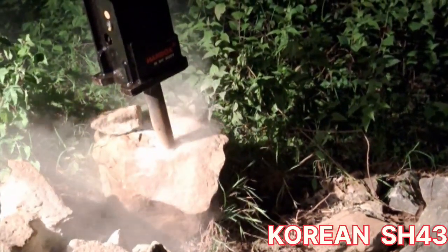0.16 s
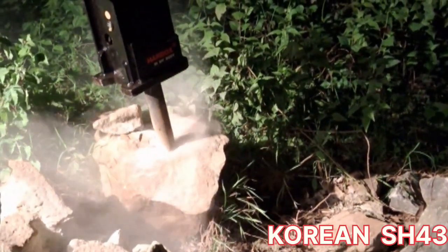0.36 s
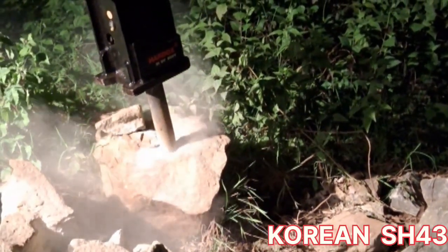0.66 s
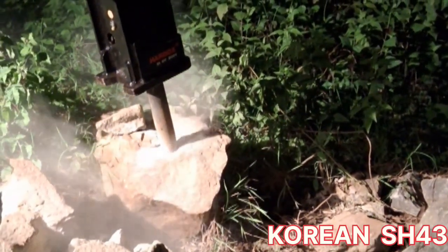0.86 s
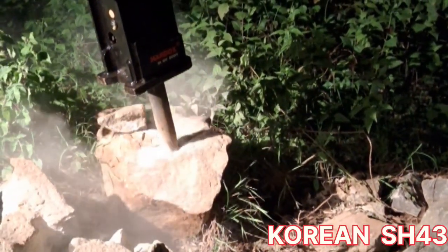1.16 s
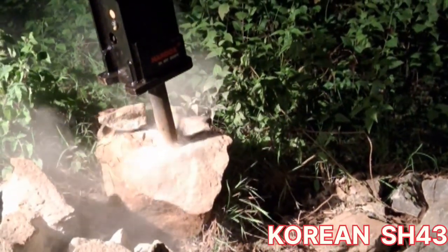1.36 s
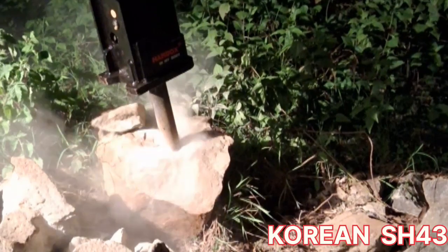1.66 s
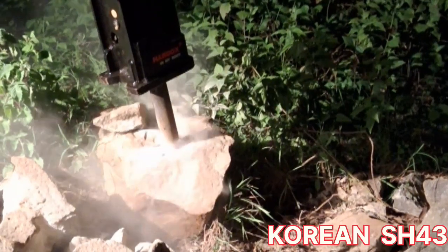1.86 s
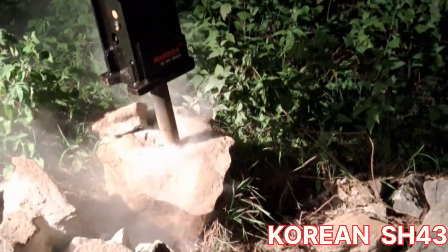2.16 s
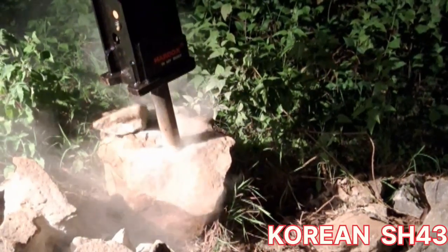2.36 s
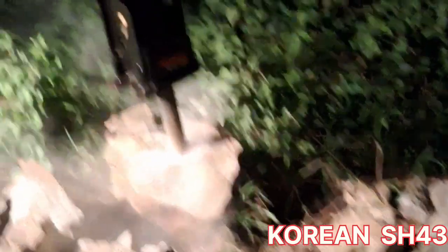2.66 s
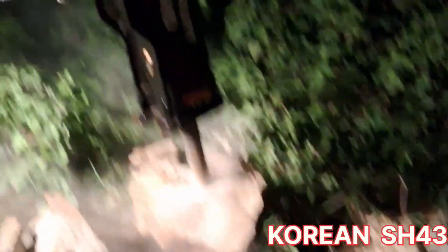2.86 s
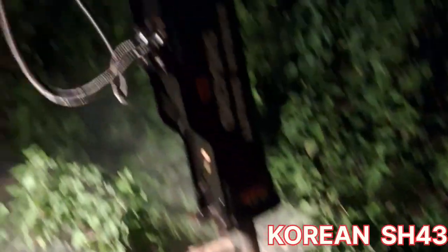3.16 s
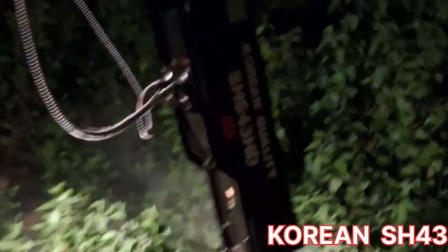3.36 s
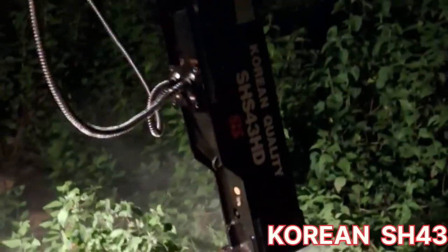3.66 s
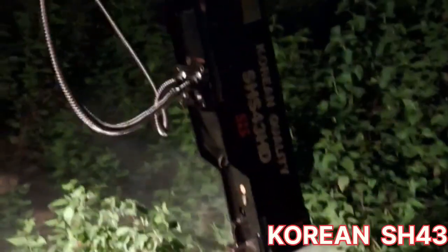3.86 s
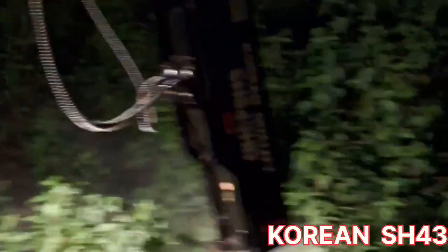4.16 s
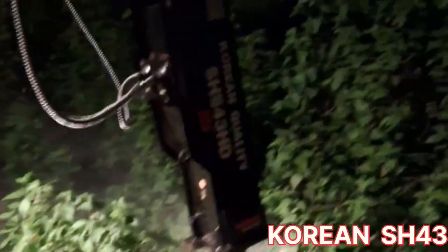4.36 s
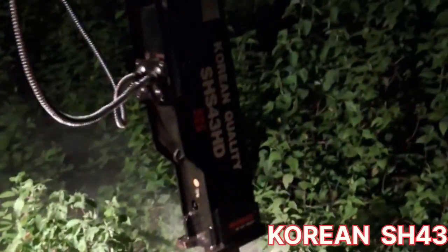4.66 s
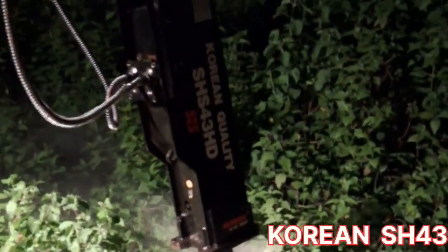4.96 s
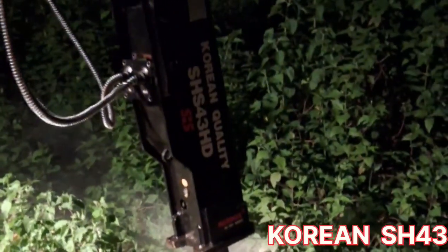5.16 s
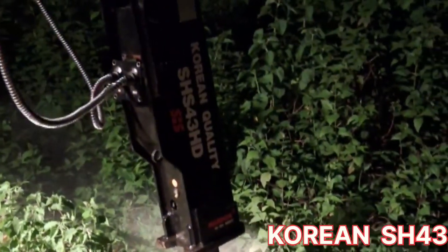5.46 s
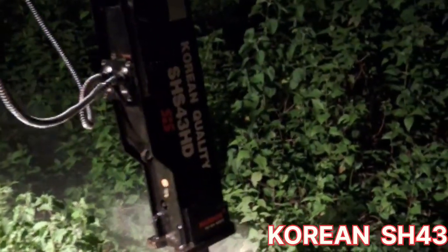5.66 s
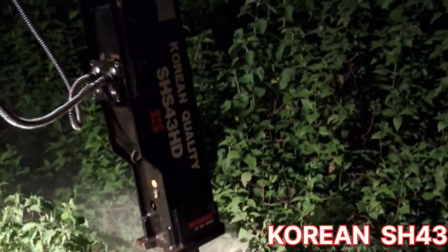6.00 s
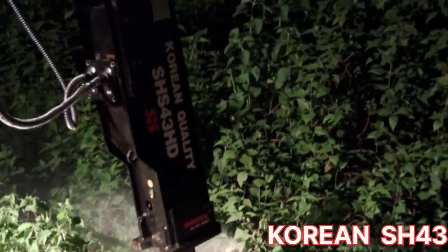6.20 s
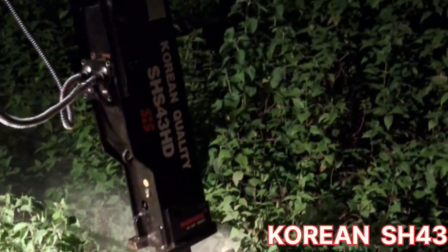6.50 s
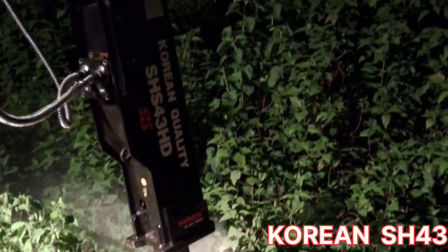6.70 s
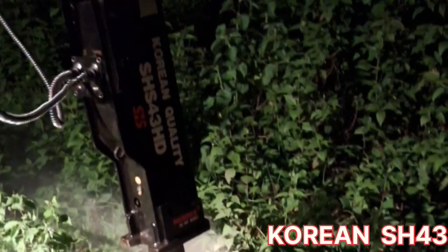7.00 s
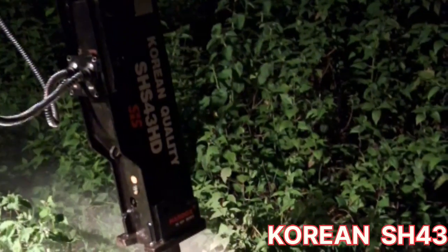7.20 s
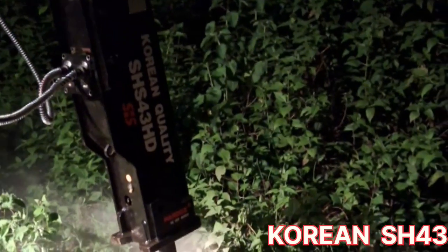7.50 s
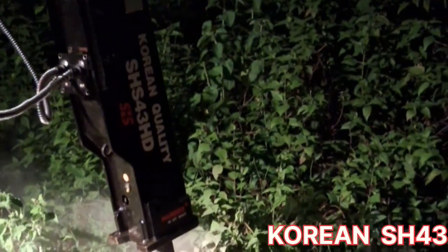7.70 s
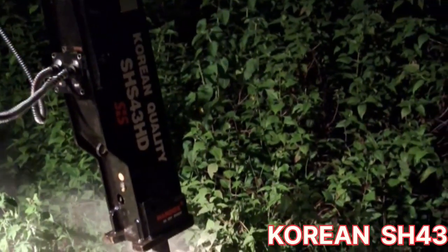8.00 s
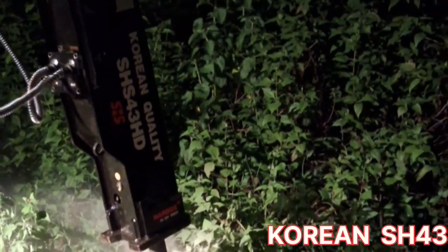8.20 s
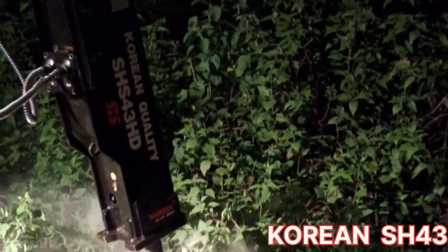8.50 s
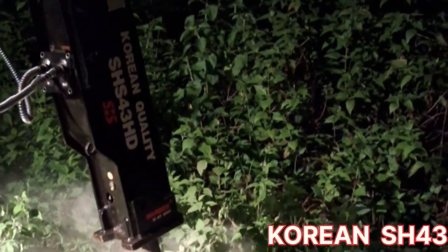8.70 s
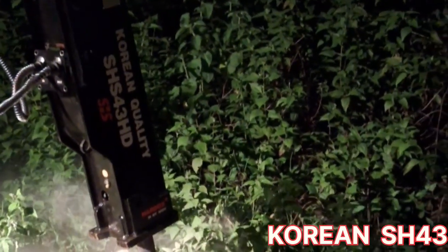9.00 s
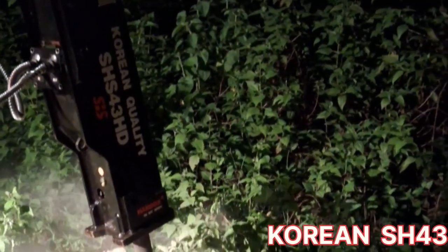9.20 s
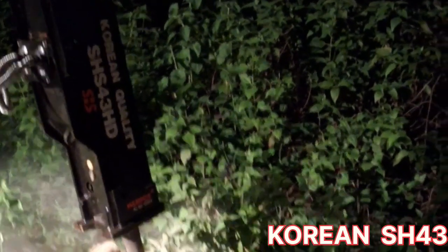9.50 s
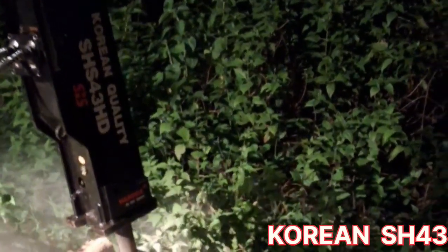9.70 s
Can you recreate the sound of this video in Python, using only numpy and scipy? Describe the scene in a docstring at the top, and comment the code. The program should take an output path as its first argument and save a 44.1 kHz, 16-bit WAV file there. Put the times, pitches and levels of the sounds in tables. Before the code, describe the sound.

Rapid, evenly spaced steel blows on rock, each a hard thump with a short falling ring, gritty crack, boxy casing boom and bright frame clatter. Three bursts, short, long, short, are split by two pauses filled with low diesel throb and hose hiss. A stone falls in the first pause and another after the last burst. Dull echoes return from an overgrown slope; close stereo pickup.

```python
"""Outdoors below an overgrown slope, in stereo: a digger's hydraulic breaker hammers a boulder in three bursts.
At about eleven blows a second, each blow thumps, rings the chisel bar and cracks the rock; filtered noise,
decaying modes and steel partials make the casing boom and the frame clatter. Oil hisses just before each blow.
A loose stone drops in each of two pauses, the slope returns dull echoes, and hoses hiss as filtered noise.
Underneath runs the diesel: exhaust tones at multiples of its firing rate, with throbbing machine noise."""
import sys
import numpy as np
from scipy import signal
from scipy.fft import rfft, irfft, next_fast_len
from scipy.io import wavfile

SR = 44100
rng = np.random.default_rng(int(sys.argv[2]) if len(sys.argv) > 2 else 0)


def dump(signal):
    """Clip the signal to [-1, 1] and save it as 16-bit WAV at the path in sys.argv[1]."""
    limited = np.clip(np.atleast_2d(signal).T, -1, 1)
    pcm = np.round(limited * 32767).astype(np.int16)
    wavfile.write(sys.argv[1], SR, pcm)


N = 434364

TIME = np.arange(N) / SR
BLOW_SAMPLES = int(.36 * SR)
AGE = np.arange(BLOW_SAMPLES) / SR   # seconds since a blow

# Bursts of hammering. Each row: first blow in seconds, number of blows.
BURSTS = [(-.0235, 7), (1.1943, 63), (7.5175, 13)]
# Pace of the piston. Each row: time in seconds, blows per second.
PACE = [(.5, 10.944), (1.2, 11.129), (1.55, 11.147), (2.1, 10.869), (2.9, 10.979), (3.4, 10.937),
        (5, 10.867), (5.6, 10.92), (6.85, 10.855), (7.5, 11.224), (7.75, 11.08), (8.4, 10.443)]
# How far the chisel has sunk into the crumbling rock. Each row: time in seconds, depth from 0 to 1.
CHISEL_DEPTH = [(0, 0), (2.7, 0), (3.3, 0.2), (5, 0.56), (6.5, 0.67), (7.5, 1), (8.7, 0.48)]
# Force of the blows. Each row: time in seconds, level in dB.
FORCE = [(0, -24.5), (1.4, -26), (2, -23.5), (2.8, -25.5), (3.25, -23), (3.7, -25.5), (4.2, -22.5),
         (5.7, -22), (7.6, -22.5), (8, -21), (8.6, -22)]
# The chisel's ring, which drops when the rock grips the tip. Each row: time in seconds, relative level in dB.
CHISEL_RING = [(0, -9.5), (.4, -6.5), (1.2, -12), (2.5, -8), (3.15, -10.5), (3.6, -19), (4.4, -9),
               (5.15, -11.5), (5.6, -15.5), (6.3, -19.5), (6.7, -13), (8.6, -14.5)]
# The casing's boom. Each row: time in seconds, level in dB relative to the force.
CASING_BOOM = [(0, -1.5), (1.3, -3), (3.3, -1.2), (3.8, -2), (5.4, -1.5), (6.13, 1.5), (6.4, -1.5),
               (7.75, -1), (8.06, 2.5), (8.35, -1), (8.6, 4)]


def piston(fresh_hz=1982, sunk_rise_hz=45.3, jitter_s=.0004, pitch_spread_hz=45, boom_spread_db=1.2,
           force_spread_db=0.86):
    """The piston cycles at its pace through each burst, with small chance differences between blows."""
    times = []
    for s, count in BURSTS:
        for _ in range(count):
            times.append(s)
            s += 1 / curve(PACE, s)
    late, sharp, boom, hard = rng.standard_normal((len(times), 4)).T
    depth = curve(CHISEL_DEPTH, times)
    force_db = curve(FORCE, times) + force_spread_db * hard
    # nominal pitch, which the chisel scales as it glides
    hz = fresh_hz + sunk_rise_hz * depth + pitch_spread_hz * (1 + depth) * sharp
    ring_db = curve(CHISEL_RING, times)
    boom_db = force_db + curve(CASING_BOOM, times) + boom_spread_db * boom
    # each row: time in seconds, nominal chisel pitch in Hz, ring, boom and force in dB
    return np.transpose([times + jitter_s * late, hz, ring_db, boom_db, force_db])


def thump(blows, hz=880, length_s=0.00055, centre_s=0.00076, thump_db=15.5):
    """The chisel is driven into the rock: one swing of pressure, down and then up."""
    out = np.zeros(N)
    from_centre = AGE - centre_s
    swing = np.sin(2 * np.pi * hz * from_centre) * np.exp(-(from_centre / length_s) ** 2)
    for s, _, _, _, force_db in blows:
        add(out, s, from_db(force_db + thump_db) * swing)
    return out * from_db([[1], [-1]])   # slightly left


def chisel(blows, settled=.955, glide=0.304, settle_s=0.00299, width_hz=430, rebound_db=-13,
           chisel_db=-3.5, least_ragged=0.28, most_ragged=0.97, ring_t60=0.029):
    """The chisel rings briefly, its pitch falling as it beds in, and rings again on the rebound."""
    out = np.zeros((2, N))
    smooth = signal.butter(3, width_hz, fs=SR, output="sos")
    chance = rng.standard_normal((len(blows), 4))
    vibrations = patterns(memory=0.853, fresh=0.11)
    for (s, hz, ring_db, _, _), pattern, (late, hard, free, bend) in zip(blows, vibrations, chance):
        # the pitch starts at (settled + glide) times nominal, give or take, and falls to settled
        bedding = glide * (1 + 0.2 * bend) * settle_s * (1 - np.exp(-AGE / settle_s))
        phase = 2 * np.pi * hz * (AGE * settled + bedding)
        sine, cosine = np.sin(phase), np.cos(phase)
        # the deeper the chisel sits, the more ragged its tone
        ragged = np.interp(curve(CHISEL_DEPTH, s), [0, 1], [least_ragged, most_ragged])
        flutter = rms_one(signal.sosfilt(smooth, pattern))
        rough = (flutter[0] * sine + flutter[1] * cosine) / np.sqrt(2)
        mid = (1 - ragged) * sine + ragged * rough
        side = (1 - ragged) * cosine / 2 + ragged * flutter[1] * sine
        strike = swell(.0016, .0012, ring_t60 * np.exp(free / 4))
        rebound = from_db(rebound_db + 4.5 * hard) * swell(0.012 + 0.0027 * late, 0.00045, 0.013)
        ring = level_one(widen([mid, side], side_db=-3) * (strike + rebound), .015)
        add(out, s, from_db(ring_db + chisel_db) * ring)
    return out * from_db([[.8], [-.8]])


# Lengthwise modes of the chisel bar. Each row: pitch in Hz, level in dB relative to the force, t60 in seconds.
BAR_MODES = [(3346, -11, .26), (6736, -20, .4)]


def bar(blows, spread_db=4.5, fresh_db=-5):
    """The chisel bar sings on between blows, more strongly once it is seated in the rock."""
    out = np.zeros((2, N))
    chance = rng.standard_normal((len(blows), len(BAR_MODES), 3))
    for (s, _, _, _, force_db), draws in zip(blows, chance):
        for (hz, mode_db, t60), (strength, *turn) in zip(BAR_MODES, draws):
            unseated_db = fresh_db * (1 - curve(CHISEL_DEPTH, s))
            level_db = force_db + mode_db + unseated_db + spread_db * strength
            tone = np.sin(2 * np.pi * hz * AGE + np.array(turn)[:, None])   # own phase left and right
            add(out, s, from_db(level_db) * swell(0.0015, .002, t60) * tone)
    return out


def rock(blows, crack_db=-3, sunk_db=7, spread_db=3.0, t60=0.065, grit_db=1.0):
    """Rock crushes under the tip in a short gritty crack, new at every blow and louder as the chisel sinks in."""
    out = np.zeros((2, N))
    for s, _, _, _, force_db in blows:
        noise = rng.standard_normal((2, BLOW_SAMPLES))
        grit = noise * from_db(grit_db * rng.exponential(1, BLOW_SAMPLES))
        depth_db = sunk_db * curve(CHISEL_DEPTH, s)
        level_db = force_db + crack_db + depth_db + spread_db * rng.standard_normal()
        crack = level_one(grit * swell(0, 0.00022, t60), 0.014)
        add(out, s + 0.00123, from_db(level_db) * crack)
    # each pair: Hz, dB per Hz
    return colour(widen(out, side_db=2.0), [(100, -42), (700, -5), (1100, -2.5), (1600, 4.5), (2400, -9),
                                            (2800, -7.5), (4500, -7.0), (8000, -31), (16000, -36.5)])


# Plate modes of the casing. Each row: pitch in Hz, relative level in dB on fresh rock, relative level in dB
# when sunk in, t60 in seconds.
CASING_MODES = [(140, -16.5, -27, 0.61), (164.2, -15, -26, 0.83), (207, -9, -15.5, 0.2),
                (269.2, -9.5, -15, 0.2), (416.2, 2.5, -9.5, .21), (479.6, 8.5, -1.5, 0.12),
                (497, -8, -24, 0.063), (607.9, 8.5, 2, 0.19), (643.6, 2.5, 0.5, 0.15),
                (685.3, 14.5, 9.5, 0.11), (850, -18, -11, 0.23), (971, -11, 4.5, 0.057),
                (979, -7, -2.5, 0.083), (1103, -35, 2, 0.058)]


def casing(blows, rise_s=.011, detune=.012, spread_db=3.0, phase_spread=0.77):
    """The box around the hammer takes up each blow slowly and booms in plate modes that shift with depth."""
    out = np.zeros((2, N))
    hz, fresh_db, sunk_db, t60 = np.transpose(CASING_MODES)
    envelopes = swell(0.0016, rise_s, t60[:, None])
    phases = rng.uniform(0, 2 * np.pi, len(hz)) + rng.normal(0, 0.075, (2, len(hz)))
    chance = rng.standard_normal((len(blows), 3, len(hz)))
    for (s, _, _, boom_db, _), (strength, turn, strain) in zip(blows, chance):
        mode_db = fresh_db + curve(CHISEL_DEPTH, s) * (sunk_db - fresh_db) + spread_db * strength
        weights = from_db(mode_db) * np.exp(1j * (phases + phase_spread * turn))
        # the plates are pressed a little differently at each blow, which shifts their pitches
        angle = (2 * np.pi * np.outer(hz * (1 + detune * strain), AGE)).astype(np.float32)
        in_phase = weights.real @ (envelopes * np.cos(angle))
        quadrature = weights.imag @ (envelopes * np.sin(angle))
        add(out, s, from_db(boom_db) * level_one(in_phase - quadrature, 0.065))
    return out * from_db([[-.5], [.5]])


# Long-ringing partials of the steel. Each row: pitch in Hz, relative level in dB.
STEEL_PARTIALS = [(1875, -1), (2060, -2), (2190, 13), (2548, 4), (3075, -1), (3385, 3.5), (3854, 0.5),
                  (4200, -2.5), (4590, -6), (4865, -1), (5020, -1), (6790, 6.5), (7040, -6.5), (8872, -1),
                  (10917, -13), (11180, -15), (12450, -17), (13447, -19), (15073, -9)]


def partials(blows, count=160, fine_db=-9, t60=0.13):
    """Main steel partials and many fine ones, struck anew at each blow with separate mid and side strengths."""
    main_hz, main_db = np.transpose(STEEL_PARTIALS)
    hz = np.append(main_hz, rng.uniform(3000, 15800, count))[:, None]
    own = from_db(np.append(main_db, np.full(count, fine_db)))
    tones = np.sin(2 * np.pi * hz * AGE + rng.uniform(0, 2 * np.pi, hz.shape))
    waves = tones * swell(0.003, 0.0011, t60)
    strengths = own * rng.standard_normal((len(blows) * 2, len(hz)))
    pairs = (strengths @ waves).reshape(len(blows), 2, -1)
    return [level_one(pair, 0.038) for pair in pairs]


# Colour of the rattling frame. Each row: frequency in Hz, level in dB per Hz.
RATTLE_COLOUR = [(30, -43.5), (150, -13), (320, -10), (450, 0), (680, 2.5), (800, -5.5), (980, 5.5),
                 (1350, -17.5), (1700, 3.5), (2000, 4), (2350, -1), (2700, -6.5), (3400, -6), (6000, -53)]
# Colour of the bright clatter and of the spurting oil. Each row: frequency in Hz, level in dB per Hz.
CLATTER_COLOUR = [(50, -23.5), (1500, 2), (2450, -2), (2750, -15.5), (3200, -4), (5000, -2.5), (6000, -8),
                  (7400, -7), (8200, -13), (9900, -15), (11200, -10.5), (12200, -10), (13300, -10.5),
                  (14300, -10), (16000, -17)]
# Resonances of the steel. Each row: centre in Hz, width in Hz, peak in dB.
STEEL_RESONANCES = [(3050, 230, 10), (3187, 60, -6.5), (3886, 150, 4), (4870, 84, 0.5), (6660, 250, 3.5),
                    (7040, 32, 1), (8840, 270, 9.5), (10910, 260, 10), (13120, 64, 4), (16100, 100, 8)]


def frame(blows, rattle_db=3.5, clatter_db=-2.0, partials_db=-3.0, valve_db=-30.5, valve_lead_s=.019):
    """Dense steel modes rattle, clatter and ring after each blow; the valve lets oil through just before it."""
    rattle, clatter = np.zeros((2, 2, N))
    dull = level_one(swell(0.001, 0.00013, 0.17), 0.033)
    bright = level_one(swell(0.00029, 0.0003, 0.25), 0.046)
    spurt = level_one(swell(0, .002, .15), .018)
    chance = rng.standard_normal((len(blows), 2))
    lows = patterns(memory=0.787, fresh=0.26)
    highs = patterns(memory=0.69, fresh=0.66)
    for (s, _, _, _, force_db), low, high, ring, (early, loud) in zip(blows, lows, highs, partials(blows), chance):
        add(rattle, s, from_db(force_db + rattle_db) * dull * low)
        add(clatter, s, from_db(force_db + clatter_db) * (bright * high + from_db(partials_db) * ring))
        # the oil's noise is the clatter's pattern played backwards
        oil = from_db(valve_db + loud) * spurt * high[:, ::-1]
        add(clatter, s - valve_lead_s + 0.0016 * early, oil)
    rattling = colour(widen(rattle, side_db=-3), RATTLE_COLOUR)
    clattering = colour(widen(clatter, side_db=0.5), CLATTER_COLOUR, STEEL_RESONANCES)
    return rattling * from_db([[1.1], [-1.1]]) + clattering * from_db([[-.5], [.5]])


def ground(blows, t60=0.065, ground_db=-46):
    """The boulder passes each blow into the ground as a soft, deep shudder."""
    out = np.zeros((2, N))
    for (s, *_), pattern in zip(blows, patterns(memory=0.61, fresh=0.48)):
        add(out, s, from_db(ground_db) * level_one(swell(0, 0.0025, t60), 0.061) * pattern)
    # each pair: Hz, dB per Hz
    return colour(widen(out, side_db=-11), [(20, -11), (45, -7.0), (110, 0), (220, 0.5), (500, -36), (1500, -75)])


# Falling stones. Each row: start in seconds, level in dB, main pitch in Hz.
STONES = [(0.792, -34.5, 2100), (9.006, -26, 1700)]
# Modes of a stone. Each row: ratio to its main pitch, relative level in dB, t60 in seconds.
STONE_MODES = [(.4, -5, 0.09), (.57, -10, 0.044), (1, -5.5, 0.078), (1.35, -5, .03)]


def stones(damping=0.11):
    """A loose piece of rock clacks on the pile, scraping a few broad, well damped modes."""
    out = np.zeros((2, N))
    edges = 1 + damping * np.array([-1, 1])
    for s, db, hz in STONES:
        for ratio, mode_db, t60 in STONE_MODES:
            mode = signal.butter(2, hz * ratio * edges, "band", fs=SR, output="sos")
            noise = widen(rng.standard_normal((2, BLOW_SAMPLES)), side_db=-7)
            scrape = rms_one(signal.sosfilt(mode, noise))
            add(out, s, from_db(db + mode_db) * swell(0, 0.0013, t60) * scrape)
    return out


# Echoes from the slope, on paths some 24 to 81 m longer than the direct one. Each row: least delay in seconds,
# level in dB.
ECHOES = [(.071, -25), (.118, -35), (.163, -36.5), (.235, -45)]


def slope(x, leaves_cut_hz=4000):
    """The overgrown slope throws back dull echoes, sides swapped and a little apart in the two ears."""
    out = np.zeros((2, N))
    dull = signal.sosfilt(signal.butter(1, leaves_cut_hz, fs=SR, output="sos"), x)
    for delay_s, db in ECHOES:
        for ear in range(2):
            add(out[ear], delay_s + rng.uniform(0, .006), from_db(db) * dull[1 - ear])
    return out


# The arm presses the breaker down between bursts. Each row: time in seconds, peak of the added hiss in dB.
PRESSES = [(.76, -60.5), (9.85, -55)]


def hoses(blows, idle_db=-71, working_db=-67, fall_db_per_s=39, surge_db=-39, surge_lead_s=0.021,
          surge_rise_db_per_s=450, surge_fall_db_per_s=250, press_fade_db_per_s=114):
    """Oil under pressure hisses: surging before each burst, flowing with the piston, swelling at each press."""
    struck = np.append(-10, blows[:, 0])
    since_blow = TIME - struck[np.searchsorted(struck, TIME) - 1]
    flow = from_db(idle_db) + from_db(working_db - fall_db_per_s * since_blow)
    for s, _ in BURSTS:
        age = TIME - s + surge_lead_s   # negative until the surge peaks
        drop_db = np.maximum(-surge_rise_db_per_s * age, surge_fall_db_per_s * age)
        flow += from_db(surge_db - np.clip(drop_db, 0, 100))
    for s, db in PRESSES:
        flow += from_db(db - press_fade_db_per_s * np.abs(TIME - s))
    # each pair: Hz, dB per Hz
    hiss = colour(rng.standard_normal((2, N)), [(1000, -14.0), (5000, -6), (9000, -10), (13000, 4), (16000, -17)])
    return flow * hiss


# Speed of the diesel. Each row: time in seconds, firings per second.
DIESEL_SPEED = [(0, 46.5), (.55, 46.3), (.8, 47.6), (1.2, 47.2), (1.6, 46.6), (6.85, 46.6), (7.2, 47.6),
                (7.55, 47), (8.6, 46.4), (8.9, 48.8), (9.27, 48.9), (9.5, 47.5), (9.85, 47.4)]
# Exhaust tones. Each row: multiple of the firing rate, rms level in dB before wavering.
EXHAUST_TONES = [(1, -51.5), (2, -47), (3, -69), (4, -61.5), (5, -61.5), (6, -54), (7, -61), (10, -70.5),
                 (15, -72), (18, -67), (21, -65), (24, -74)]
# Load on engine and pump. Each row: time in seconds, noise level in dB before load_trim_db.
ENGINE_LOAD = [(0, -53), (.7, -44), (1.0, -47.5), (1.3, -37), (6.9, -41.5), (7.4, -41.5), (8.8, -40.5),
               (9.15, -42.5), (9.5, -42.5), (9.7, -41.5), (9.85, -38)]
# Colour of the machine's noise. Each row: frequency in Hz, level in dB per Hz.
MACHINE_COLOUR = [(30, -50.5), (70, -1.5), (120, -1.5), (180, -6), (280, 1.5), (390, -5.5), (650, -9.5),
                  (1000, -10), (1500, -10), (2500, -14.5), (4000, -18.5), (5500, -24.5), (9000, -30),
                  (16000, -30)]
# Resonances of the engine housing. Each row: centre in Hz, width in Hz, peak in dB.
HOUSING_RESONANCES = [(275, 20, -0.5), (480.4, 29, 9.5), (702, 14, 13.5), (972, 105, 11), (1293, 12, 11.5)]


def diesel(throb=.15, waver=.08, load_trim_db=-2.5, rumble_db=-61):
    """Wavering exhaust tones at multiples of the firing rate, and machine noise that throbs twice per firing."""
    phase = 2 * np.pi * np.cumsum(curve(DIESEL_SPEED, TIME)) / SR
    knots = np.arange(0, 10, .08)   # a new chance value every 0.08 s
    tones = 0
    for order, db in EXHAUST_TONES:
        wobble, sway = (np.interp(TIME, knots, row) for row in rng.standard_normal((2, len(knots))))
        start = rng.uniform(0, 2 * np.pi) + np.array([[.35], [-.35]])   # phase left and right
        tone = np.sin(order * phase + waver * sway + start)
        tones = tones + np.sqrt(2) * from_db(db) * (1 + waver * wobble) * tone
    white = rng.standard_normal((2, 2, N))
    throbbing = widen(white[0], side_db=-3.5) * (1 + throb * np.sin(2 * phase))
    noise = colour(throbbing, MACHINE_COLOUR, HOUSING_RESONANCES) * from_db([[-.8], [.8]])
    deep = signal.butter(2, [40, 130], "band", fs=SR, output="sos")
    rumble = rms_one(signal.sosfilt(deep, widen(white[1], side_db=-17)))
    return tones + from_db(curve(ENGINE_LOAD, TIME) + load_trim_db) * noise + from_db(rumble_db) * rumble


def from_db(db):
    """Decibels to amplitude."""
    return 10 ** (np.asarray(db) / 20)


def rms_one(x):
    """Scales a sound to rms 1."""
    return x / np.sqrt(np.mean(x ** 2) + 1e-20)


def curve(rows, at):
    """Reads a two-column table at any point, in straight lines between its rows."""
    return np.interp(at, *np.transpose(rows))


def add(out, s, sound):
    """Mixes a sound into out, starting at s seconds."""
    start = int(round(s * SR))
    first, last = max(start, 0), min(start + sound.shape[-1], N)
    out[..., first:last] += sound[..., first - start:last - start]


def swell(delay_s, rise_s, t60):
    """Envelope of a struck part: it waits, builds up and dies away."""
    age = np.maximum(AGE - delay_s, 0)
    return (1 - np.exp(-age / rise_s)) * from_db(-60 * age / t60)


def level_one(x, over_s):
    """Scales a blow to rms 1 over its first moments."""
    return x / np.sqrt(np.mean(x[..., :int(over_s * SR)] ** 2) + 1e-20)


def widen(pair, side_db):
    """Mid and side to left and right, at equal power."""
    side = from_db(side_db)
    return np.array([pair[0] + side * pair[1], pair[0] - side * pair[1]]) / np.sqrt(1 + side ** 2)


def colour(x, spectrum, resonances=()):
    """Causal (minimum-phase) filter of unit power gain from a spectrum and resonance peaks."""
    size = next_fast_len(N + SR // 2)
    size += size % 2
    hz = np.maximum(np.arange(size // 2 + 1) * SR / size, 1)
    points = np.array(spectrum)
    db = np.interp(np.log(hz), np.log(points[:, 0]), points[:, 1])
    for centre, width, peak_db in resonances:
        db = db + peak_db / (1 + (2 * (hz - centre) / width) ** 2)
    # folding the cepstrum onto positive times makes the filter minimum-phase
    cepstrum = irfft(np.log(rms_one(from_db(db))))
    cepstrum[1:size // 2] *= 2
    cepstrum[size // 2 + 1:] = 0
    return irfft(rfft(x, size) * np.exp(rfft(cepstrum)))[..., :N]


def patterns(memory, fresh):
    """One dense vibration pattern per blow: part carried on from the blow before, part new."""
    kept = rng.standard_normal((2, BLOW_SAMPLES))
    while True:
        change, new = rng.standard_normal((2, 2, BLOW_SAMPLES))
        kept = memory * kept + np.sqrt(1 - memory ** 2) * change
        yield np.sqrt(1 - fresh) * kept + np.sqrt(fresh) * new


def scene():
    """The breaker and the stones with their echoes, over the hissing hoses and the running diesel."""
    blows = piston()
    hits = thump(blows) + chisel(blows) + bar(blows) + rock(blows)
    hits = hits + casing(blows) + frame(blows) + ground(blows) + stones()
    return hits + slope(hits) + hoses(blows) + diesel()


def record(dry, top=1.48, low_cut_hz=30, cutoff_hz=15900):
    """The deepest rumble is dropped, the highest peaks are rounded and the top is cut."""
    heard = signal.sosfilt(signal.butter(2, low_cut_hz, "high", fs=SR, output="sos"), dry)
    rounded = top * np.tanh(heard / top)
    return signal.sosfilt(signal.ellip(10, .1, 70, cutoff_hz, fs=SR, output="sos"), rounded)


dry = scene()
out = record(dry)
dump(out)
```